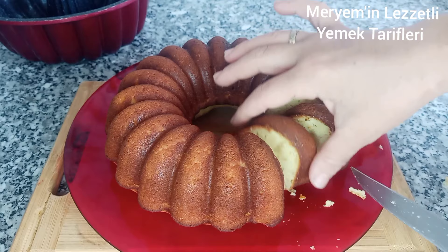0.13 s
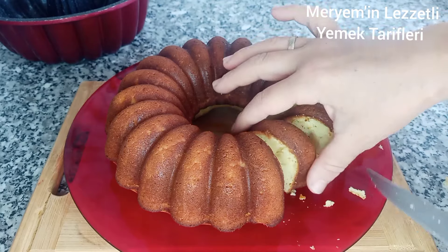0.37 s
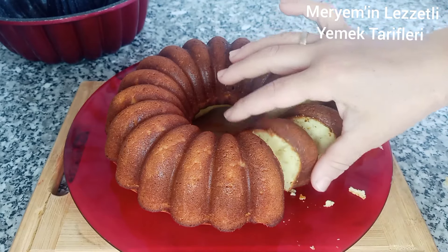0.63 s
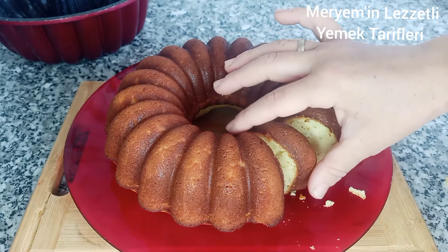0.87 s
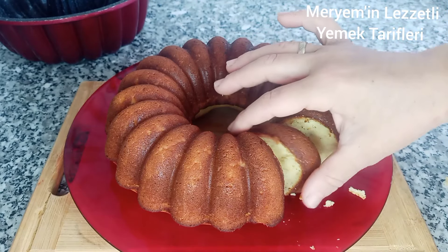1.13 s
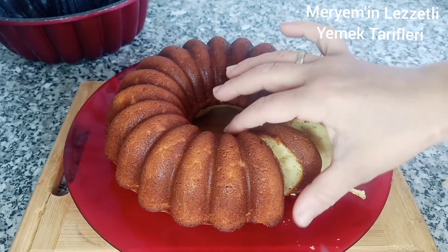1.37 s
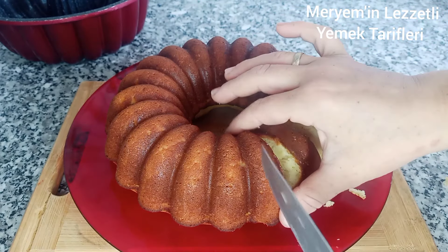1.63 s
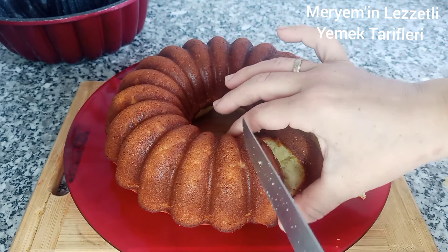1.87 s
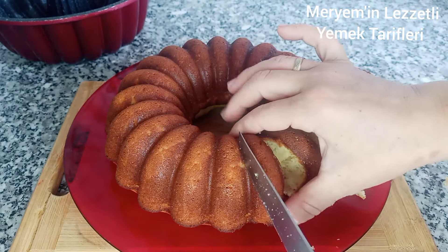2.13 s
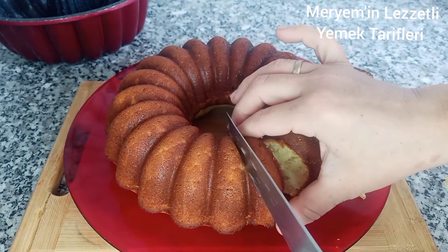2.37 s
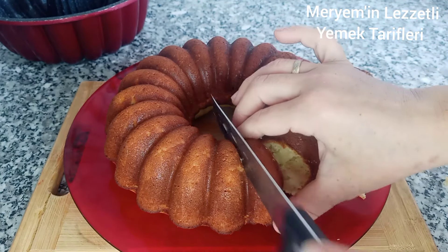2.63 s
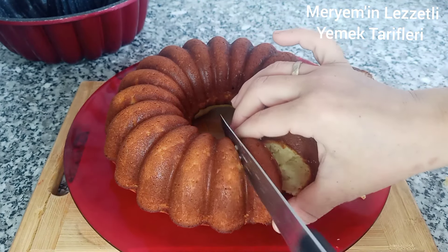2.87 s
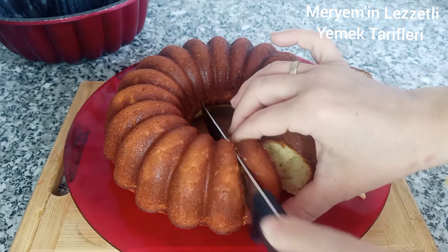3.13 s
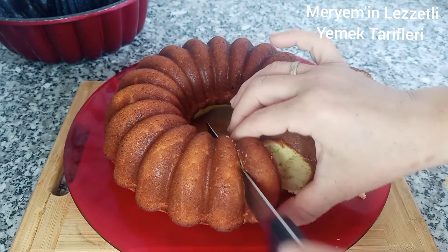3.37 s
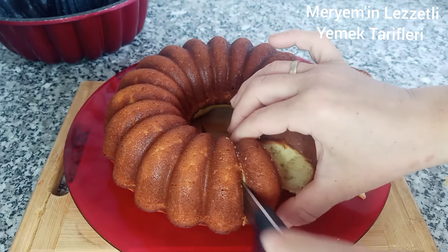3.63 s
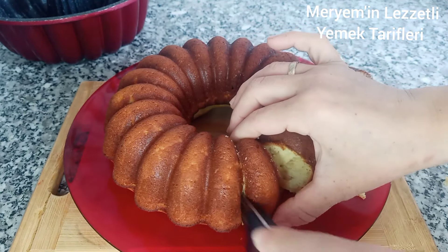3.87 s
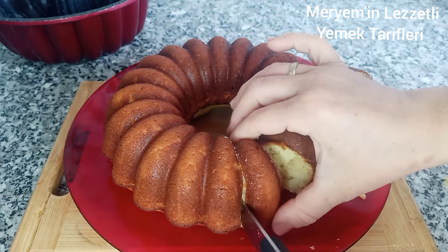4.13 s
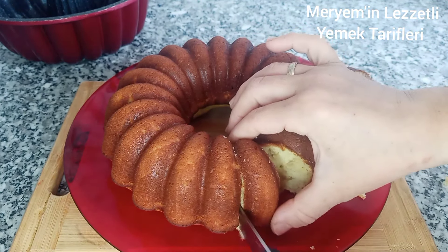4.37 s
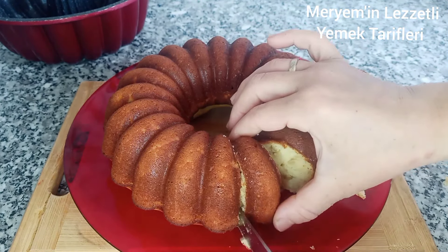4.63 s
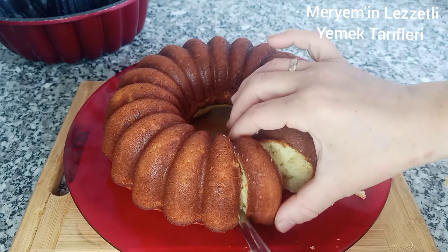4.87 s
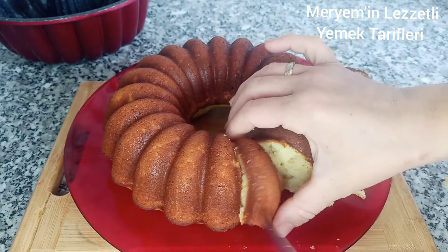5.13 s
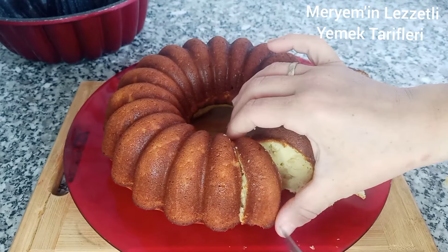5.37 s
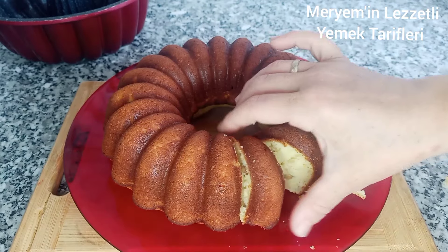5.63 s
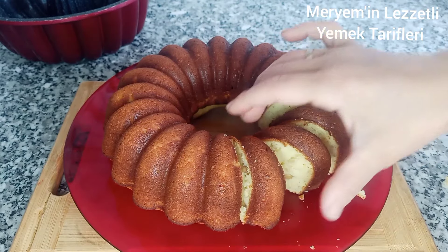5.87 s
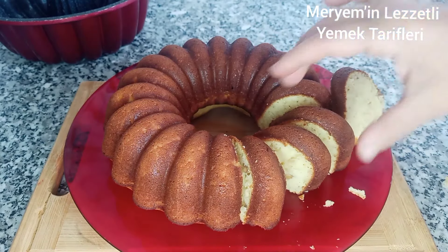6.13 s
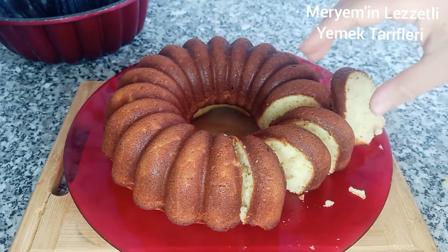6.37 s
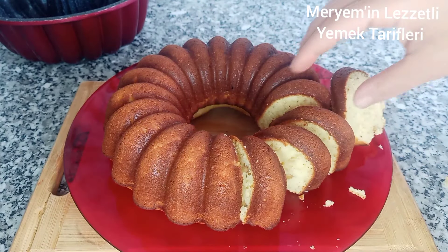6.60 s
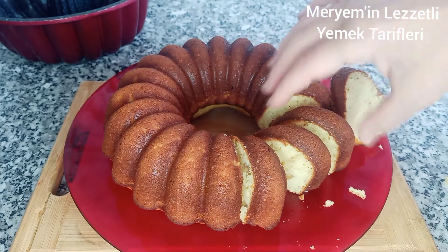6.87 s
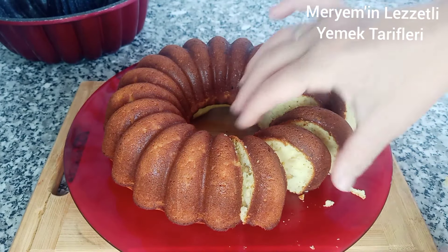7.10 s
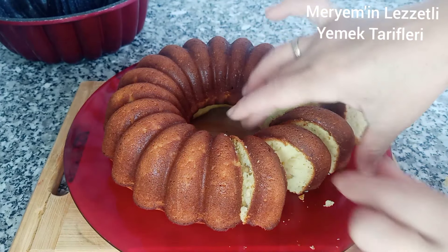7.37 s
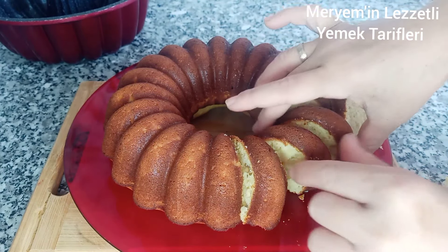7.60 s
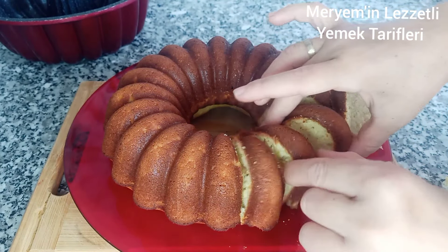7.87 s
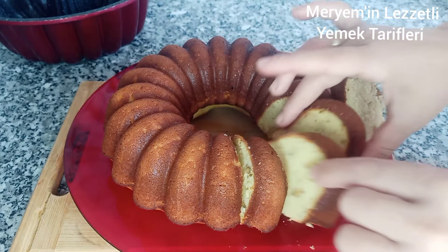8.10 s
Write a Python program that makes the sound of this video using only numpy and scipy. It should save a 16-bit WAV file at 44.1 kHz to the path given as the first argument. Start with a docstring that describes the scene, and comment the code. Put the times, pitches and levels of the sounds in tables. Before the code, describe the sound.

Muffled thumps from elsewhere in the house open over a faint machine hum. A knife ticks lightly, then rubs through soft cake in breathy strokes. Loud, dry clicks strike the glass plate, with brief gritty drags between and after. The blade clacks and skids onto a stone counter, leaving hum and barely audible scrapes. Near phone microphone in a small, lightly echoing kitchen.

```python
"""Dull knocks from elsewhere in the house open the scene and come back later; a quiet kitchen hums throughout.
A knife clicks faintly on a glass plate, then saws through a soft cake: filtered grain noise hisses in strokes.
The blade clicks hard on the plate and drags over it: damped modes are struck or kept ringing by noise.
The knife is laid on a stone counter, bouncing and skidding; last come faint scrapes and clicks on the plate."""
import sys
import numpy as np
from scipy import signal
from scipy.fft import rfft, irfft
from scipy.io import wavfile
from scipy.ndimage import uniform_filter1d

SR = 44100
rng = np.random.default_rng(int(sys.argv[2]) if len(sys.argv) > 2 else 0)


def to_wav(sig):
    """Store sig (one row per channel, or 1-D mono) as 16-bit WAV at the path in sys.argv[1].

    Samples outside -1..1 are clipped; the rate is SR.
    """
    pcm = np.clip(np.atleast_2d(sig), -1, 1) * 32767
    pcm = np.round(pcm).astype(np.int16)
    wavfile.write(sys.argv[1], SR, pcm.T)  # frames by channels


def elevation(decibels):
    """Turn decibel levels (scalar or array-like) into linear amplitude ratios."""
    levels = np.asarray(decibels, float)
    return 10 ** (levels / 20)


N = 363384
T = np.arange(N) / SR

# Blade meets plate: t/s, dry peak level at 1.8-3.3 kHz/dB, then levels relative to that/dB:
# at 0.8-1.8 kHz, at 3.3-5.6 kHz, at 5.6-8 kHz
PLATE_TAPS = [(1.272, -53.5, -7, -20, -24), (1.73, -55, -20, -7, -13), (2.075, -44.5, -31, 0.5, -9.5),
              (3.560, -53, -0.5, -10, -6), (3.9485, -9.5, -10, -7, -1.5), (4.295, -16, -14, -3.5, -4),
              (4.614, -55, -7, 5, -16), (4.750, -13.5, -24, 3, -11.5), (4.969, -38, -17, -3, -31),
              (4.988, -36.5, -18, -11, -31), (4.997, -34.5, -13.5, -1, -16), (5.010, -44.5, -14, 0, -5),
              (5.060, -53, 12, -2, 6.5), (5.095, -61.5, -3, 2, -11), (5.240, -43.5, -24.5, 5.5, 5),
              (5.245, -56, -20, 2, -4), (5.268, -55, -14, 3, -4), (5.281, -59, -11, 12, 16.5),
              (7.881, -55, -21, -15, -20), (7.94, -62, -15, 0, -16)]
# Knife laid on the counter, bouncing: same columns as the plate taps
COUNTER_BOUNCES = [(6.404, -31, -15, 4.5, 10), (6.4245, -45.5, -23, 4.9, 16), (6.439, -44.5, -22, 4.1, 8.5),
                   (6.614, -62, -17, 19, 15), (6.629, -19.5, -26.5, 3.1, 0), (6.6315, -26.5, -6.5, 2.5, -5)]
# Inner edges of the pitch zones of a blow: f/Hz
PITCH_ZONES = (1800, 3300, 5600, 8000)
# Modes of the plate damped by the cake: f/Hz, relative level/dB
PLATE_MODES = [(965, 2.5), (1180, -4), (1310, -6), (1420, -6), (1520, 2), (1760, -11), (2050, -12),
               (2220, -2.5), (2400, -9), (2610, -0.5), (2695, 5.5), (2830, 1.5), (3250, -13.5),
               (3610, -18.5), (3750, -3), (4150, -0.5), (4580, -6.5), (4915, -2.5), (5310, -7), (5890, -6),
               (6430, -3.5), (6590, -10), (6885, 4), (7300, -17.5), (8330, -23), (9050, 2.5), (10300, -1),
               (11280, -5.5), (13600, -22), (15000, -14.5)]
# Modes of the free steel blade and handle: f/Hz, relative level/dB
KNIFE_MODES = [(900, 8.5), (1200, -16.5), (1560, 2), (2200, -3.5), (2840, 4), (3650, -3.5), (4500, 6.5),
               (4900, 2.5), (6360, 6), (7120, -15.5), (7820, -6), (8700, -2.5), (9770, 1.5), (11690, 7),
               (13760, 0.5), (14800, 9), (15700, -27)]
# Modes of the blade held in the cake: f/Hz, relative level/dB
HELD_BLADE_MODES = [(1750, -6.5), (2300, -1), (2780, -2), (3300, -0.5), (4000, -7), (4450, 1.5),
                    (4700, -2.5), (5750, 1.5), (5900, 4.5), (6550, -3.5), (8500, -10), (8900, -14),
                    (9900, -11), (10600, -17.5), (11400, -14.5)]
# Blade rubbing crumb, long pushes and short pulls: t of full pressure/s, level/dB, rise/s, fall/s,
# treble level relative to the body/dB
SAW_STROKES = [(2.59, -56, 0.3, 0.077, -8.5), (2.8, -59.5, 0.097, 0.055, -9),
               (3.09, -51.5, 0.16, 0.073, -10), (3.28, -64.5, 0.063, 0.059, -6.5),
               (3.55, -60.5, 0.13, 0.051, -12.5), (3.705, -72, 0.053, 0.031, -21.5),
               (3.94, -62, 0.089, 0.0094, -15)]
# Colour of the tearing crumb: f/Hz, relative level per Hz/dB
CRUMB_COLOUR = [(1000, -18.5), (1600, -2.5), (2300, -4.5), (4450, -1), (6600, -5.5), (7400, -13),
                (11000, -18.5), (12000, -22.5), (13800, -25), (14800, -17.5)]
# Blade tip or a slice drags over the plate: t of full pressure/s, level/dB, rise/s, fall/s
PLATE_DRAGS = [(.055, -65.5, 0.0093, 0.038), (.14, -63, .03, 0.04), (4.45, -65, 0.038, 0.041),
               (4.72, -61.5, .08, 0.018), (4.738, -43, .014, .012), (5.0, -55.5, 0.018, 0.025),
               (5.246, -57, 0.0076, 0.015), (5.277, -52, 0.017, 0.0085), (7.35, -72.5, 0.25, .25),
               (7.6, -74.5, 0.046, 0.054), (7.952, -71, 0.035, 0.028)]
# Knife skids on the stone: same columns as the plate drags
STONE_SKIDS = [(6.447, -46, .004, .016), (6.503, -47, .045, .035)]
# Dull knocks, on the board and elsewhere: t/s, body level/dB, low edge f/Hz, high edge f/Hz, length/s
DULL_KNOCKS = [(0, -39.5, 118, 460, 0.079), (0.215, -30.5, 170, 648, .21), (.77, -51.5, 117, 213, 0.19),
               (1.062, -42.5, 79, 300, 0.3), (3.123, -57, 45, 99, 0.35), (3.579, -56, 45, 90, .25),
               (4.763, -54, 344, 590, 0.095), (5.053, -45.5, 440, 1490, 0.047),
               (5.916, -54.5, 121, 405, 0.2), (6.626, -39.5, 200, 940, 0.18)]
# The hum swells and fades: t/s, level near 100 Hz/dB, level of the rumble around it/dB
HUM_SWELLS = [(0.0, -70, -65), (0.64, -85, -81), (1.12, -71.5, -62), (2.13, -79.5, -80), (2.41, -62, -70),
              (2.96, -76.5, -88), (3.19, -66.5, -73.5), (4.52, -74, -74), (5.0, -63.5, -77),
              (5.99, -66, -69), (6.27, -68.5, -76.5), (7.39, -66.5, -73.5), (7.82, -63, -72),
              (8.24, -66.5, -77)]
# Loudest puffs of the boom near 160 Hz: start t/s, nominal length/s, nominal level/dB
BOOM_PUFFS = [(1.847, 0.074, -57.5), (1.999, 0.025, -57), (2.121, 0.13, -56.5), (2.304, 0.062, -59),
              (2.42, 0.05, -58), (2.527, 0.036, -57), (2.603, 0.061, -53), (4.998, 0.12, -55),
              (5.145, 0.072, -53), (5.283, 0.13, -51.5), (5.588, 0.16, -50.5), (5.872, 0.049, -54.5),
              (6.005, 0.034, -56.5), (6.19, 0.04, -56.5), (6.55, 0.034, -55.5), (6.639, 0.025, -50),
              (6.689, 0.17, -51), (6.893, 0.031, -57), (7.078, 0.039, -56.5), (7.468, 0.067, -53.5),
              (7.556, 0.11, -54)]
# Narrow room resonances: f/Hz, width/Hz, middle level/dB
ROOM_MODES = [(200, 14, -74.5), (335.7, 38, -73.5), (523.4, 24, -77.5), (780, 170, -80.5),
              (1052, 30, -82.5)]
# Colour of the steady hiss: f/Hz, relative level per Hz/dB
HISS_COLOUR = [(25, -19), (45, 6), (100, 15), (250, 7), (500, -1), (1000, -6), (2000, -9.5), (4000, -14),
               (7000, -14), (7900, -23), (13800, -26.5), (14400, -13), (15800, -20.5), (16100, -33)]
# Decay of the room: octave centre f/Hz, t60/s
ROOM_DECAY = [(700, .33), (1400, 0.37), (2800, 0.27), (5600, 0.21), (11200, 0.15)]


def strikes(rows, modes, t60, crack_db, crack_s, top_db):
    """A blow rings the modes plus a crack that grows with force; the spot hit sets the share of each pitch zone."""
    chatter_s, chatter_db = 0.006, -3  # the edge chatters as it lands
    out, t = np.zeros(N), T[:SR // 5]
    edges_hz = (800, *PITCH_ZONES, 16000)
    for s, peak_db, low_db, mid_db, high_db in rows:
        ringing = ring(modes, t60, t, spot_db=2)
        crack = band(noise(len(t)), 550, 6700, order=1) * np.exp(-t / crack_s)
        blow = ringing + elevation(crack_db + 0.37 * peak_db) * crack
        chatter = noise(SR // 40) * np.exp(-t[:SR // 40] / chatter_s)
        chatter /= np.linalg.norm(chatter)
        blow = blow + elevation(chatter_db) * np.convolve(blow, chatter)[:len(t)]
        shares_db = (low_db, 0, mid_db, high_db, high_db + top_db)
        for lo_hz, hi_hz, share_db in zip(edges_hz[:-1], edges_hz[1:], shares_db):
            part = band(blow, lo_hz, hi_hz, order=3)
            add(out, s, elevation(peak_db + share_db) * part / np.abs(part).max())
    return out


def ring(modes, t60, t, spot_db):
    """A blow on a damped body: decaying sines, each with chance strength, sign and slight detune."""
    detune = 0.008  # spread as a share of the mode's pitch
    hz, db = np.transpose(modes)[:, :, None]
    strength, sign, shift = rng.standard_normal((3, len(hz), 1))
    wave = np.sin(2 * np.pi * hz * (1 + detune * shift) * t)
    decay = elevation(db + spot_db * strength - 60 * t / t60)
    return (decay * wave * np.sign(sign)).sum(axis=0)


def rub(rows, grain_db, split_hz, sing_db):
    """Dense tiny grains tear under the blade and make it sing faintly; pressure sets the level."""
    wobble_db, blade_t60_s = 1.3, 0.017
    slips = noise() * elevation(grain_db * walk(250) + wobble_db * walk(40))
    blade = ring(HELD_BLADE_MODES, blade_t60_s, T[:SR // 5], spot_db=0)
    singing = signal.fftconvolve(slips, blade)[:N]
    grains = unit(colour(slips, CRUMB_COLOUR)) + elevation(sing_db) * unit(singing)
    body = unit(band(grains, 1500, 1.08 * split_hz, order=3))
    treble = unit(band(grains, split_hz, 16000, order=3))
    body_rows = [row[:4] for row in rows]
    treble_rows = [(s, db + bright_db, rise, fall) for s, db, rise, fall, bright_db in rows]
    return strokes(body_rows) * body + strokes(treble_rows) * treble


def scrape(rows, modes, t60, lo_hz, hi_hz):
    """Stick-slip: a dense stream of uneven micro-blows keeps the modes ringing."""
    grit_db = 5  # spread of the unevenness
    slips = noise() * elevation(grit_db * walk(500))
    ringing = signal.fftconvolve(slips, ring(modes, t60, T[:SR // 5], spot_db=0))[:N]
    return strokes(rows) * unit(band(ringing, lo_hz, hi_hz, order=3))


def strokes(rows):
    """Gain of rounded swells, edge_db down one rise before and one fall after their top."""
    edge_db = -20
    rise_power, fall_power = 1.6, 2.6  # pressure builds steadily and lets go abruptly
    gain = np.zeros(N)
    for s, db, rise_s, fall_s in rows:
        rising = T < s
        distance = np.abs(T - s) / np.where(rising, rise_s, fall_s)
        gain += elevation(db + edge_db * distance ** np.where(rising, rise_power, fall_power))
    return gain


def knocks():
    """Soft blows: a rounded rise, a lumpy low body that holds and then dies, a shorter slap on top."""
    slap_db = -22.5  # relative to the body
    out, t = np.zeros(N), T[:SR]
    for s, db, lo_hz, hi_hz, length_s in DULL_KNOCKS:
        swell = (1 - np.exp(-t / (0.059 * length_s))) * elevation(-30 * (t / length_s) ** 1.5)
        body = unit(band(noise(SR), lo_hz, hi_hz, order=4))
        slap = unit(band(noise(SR), 1300, 2380, order=4)) * elevation(slap_db - 15 * t / length_s)
        add(out, s, elevation(db) * (body + slap) * swell)
    return out


def kitchen():
    """The quiet bed: hiss, machine hum, boom and narrow room resonances, summed."""
    return hiss() + hum() + boom() + room_resonances()


def hum():
    """Machine hum: a steady tone blurred by narrow noise, over a band of rumble, both swelling and fading."""
    s, mains_db, deep_db = np.transpose(HUM_SWELLS)
    mains = np.sin(2 * np.pi * 100.2 * T) + 1.4 * unit(band(noise(), 92, 110))
    rumble = unit(band(noise(), 44, 140))
    mains_gain = elevation(np.interp(T, s, mains_db) + 3.5 * walk(8))
    return mains_gain * mains + elevation(np.interp(T, s, deep_db) + 4 * walk(17)) * rumble


def boom():
    """A sine wavering around 162 Hz swells in puffs over a faint, uneven level."""
    between_db = -68  # middle level between the puffs
    wavering_hz = 162 + 8 * walk(30)
    rows = [(s + length_s / 2, db + 2.5, 0.65 * length_s, 0.47 * length_s)
            for s, length_s, db in BOOM_PUFFS]
    gain = strokes(rows) + elevation(between_db + 4.4 * walk(14))
    return gain * np.sqrt(2) * np.sin(2 * np.pi * np.cumsum(wavering_hz) / SR)


def room_resonances():
    """Noise caught in narrow room resonances, each drifting in level."""
    puff_db = 5  # spread of the drift
    out = np.zeros(N)
    for hz, width, db in ROOM_MODES:
        out += elevation(db + puff_db * walk(8.5)) * unit(band(noise(), hz - width / 2, hz + width / 2))
    return out


def hiss():
    """Steady coloured hiss, mottled in small patches as by the phone's noise suppression."""
    level_db = -73  # between 1.44 and 16 kHz
    x = mottled(colour(noise(), HISS_COLOUR), depth_db=2.0)
    return elevation(level_db) * x / np.std(band(x, 1439.5, 16000))


def mottled(x, depth_db):
    """Smoothed random gains on a spectrogram mottle the hiss, as the phone's noise suppression does."""
    z = signal.stft(x, nperseg=1024)[2]
    patches = rng.standard_normal(z.shape)
    for axis in (0, 1):
        patches = uniform_filter1d(patches, size=3, axis=axis)
    return signal.istft(z * elevation(depth_db * patches / patches.std()), nperseg=1024)[1][:N]


def room(x, wet_db, gap_s):
    """Hard walls answer with a dense noise tail, swelling in after a gap, whose treble dies first."""
    t = T[:SR // 2]
    tail = np.zeros(len(t))
    for hz, t60 in ROOM_DECAY:
        tail += band(noise(len(t)), hz / np.sqrt(2), hz * np.sqrt(2)) * elevation(-60 * t / t60)
    tail *= 1 - np.exp(-(t / gap_s) ** 2)
    return x + elevation(wet_db) * signal.fftconvolve(x, tail / np.linalg.norm(tail))[:N]


def noise(n=N):
    """White noise."""
    return rng.standard_normal(n)


def unit(x):
    """Scale to rms 1."""
    return x / np.sqrt(np.mean(x ** 2))


def band(x, lo_hz, hi_hz, order=2):
    """Band-pass."""
    return signal.sosfilt(signal.butter(order, [lo_hz, hi_hz], "band", fs=SR, output="sos"), x)


def colour(x, points):
    """Shape the spectrum by (f/Hz, level/dB) points joined on a log axis."""
    hz, db = np.transpose(points)
    f = np.arange(len(x) // 2 + 1) * SR / len(x) + 1
    return irfft(rfft(x) * elevation(np.interp(np.log(f), np.log(hz), db)), len(x))


def walk(rate):
    """Random levels held 1 / rate s and slewed twice; rms 1."""
    k = int(SR / rate)
    held = np.repeat(noise(N // k + 1), k)
    return unit(uniform_filter1d(uniform_filter1d(held, k), k)[:N])


def add(out, s, x):
    """Mix x into out from time s on."""
    i = max(int(s * SR), 0)
    out[i:i + len(x)] += x[:N - i]


def scene():
    """Knife, plate and counter sound in the room; knocks and hum are already diffuse."""
    near = strikes(PLATE_TAPS, PLATE_MODES, t60=0.024, crack_db=13, crack_s=0.0063, top_db=-11)
    near += strikes(COUNTER_BOUNCES, KNIFE_MODES, t60=0.022, crack_db=34, crack_s=0.0016, top_db=-1.5)
    near += rub(SAW_STROKES, grain_db=1.0, split_hz=6900, sing_db=-5)
    near += scrape(PLATE_DRAGS, PLATE_MODES, t60=0.02, lo_hz=2000, hi_hz=5874)
    near += scrape(STONE_SKIDS, KNIFE_MODES, t60=0.015, lo_hz=4100, hi_hz=14170)
    return (room(near, wet_db=-11, gap_s=0.0085) + knocks() + kitchen())[None]


def band_limit(x):
    """A steep low-pass at the top of the band."""
    return signal.sosfilt(signal.butter(12, 16800, fs=SR, output="sos"), x)


def record(dry):
    """The phone cuts the top steeply at 16.1 kHz."""
    top_cut = signal.ellip(8, 0.2, 60, 16100, fs=SR, output="sos")
    mix = signal.sosfilt(top_cut, dry)
    return band_limit(mix)


dry = scene()
out = record(dry)
to_wav(out)
```